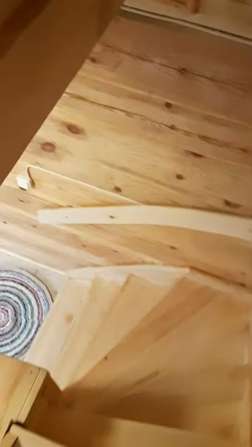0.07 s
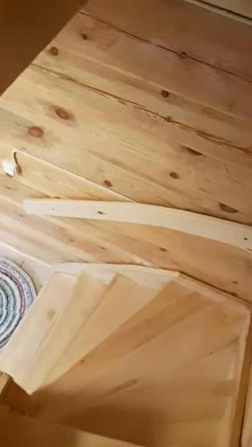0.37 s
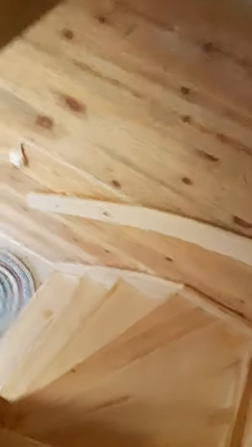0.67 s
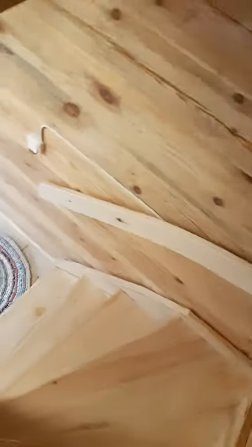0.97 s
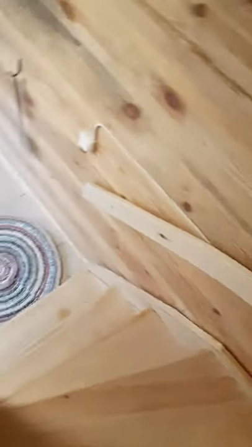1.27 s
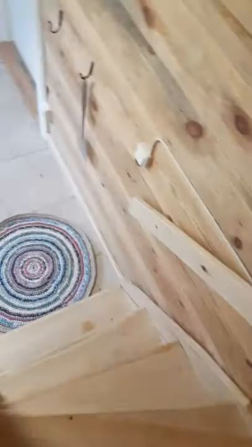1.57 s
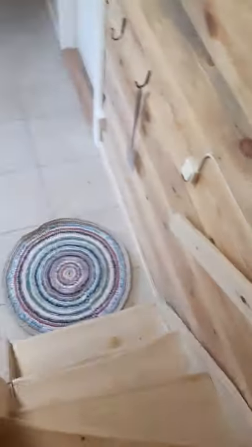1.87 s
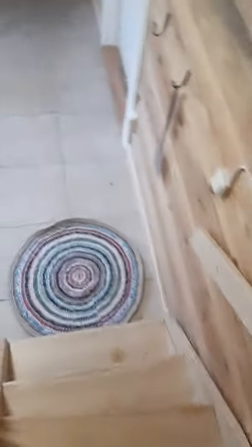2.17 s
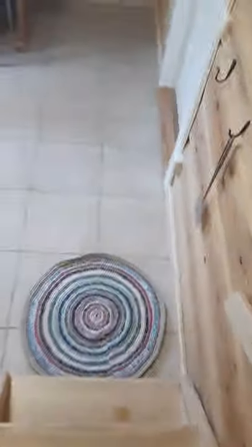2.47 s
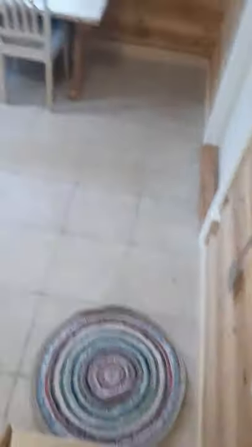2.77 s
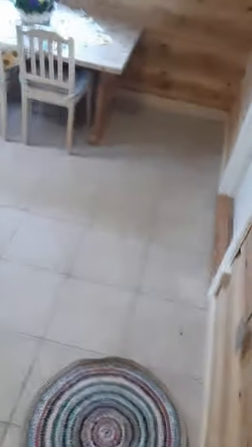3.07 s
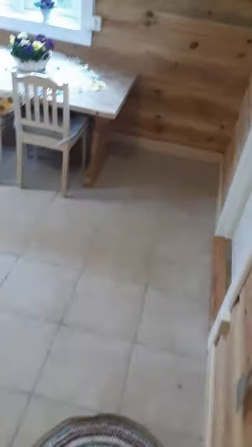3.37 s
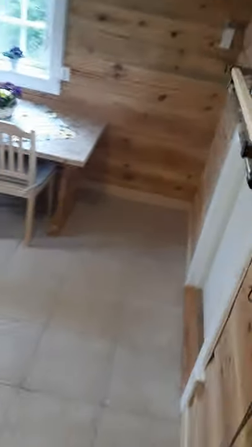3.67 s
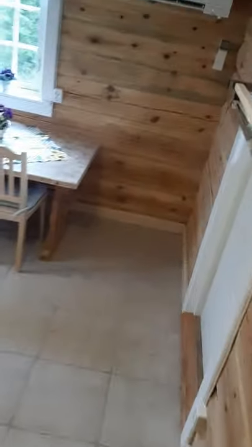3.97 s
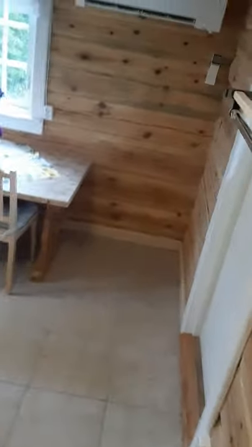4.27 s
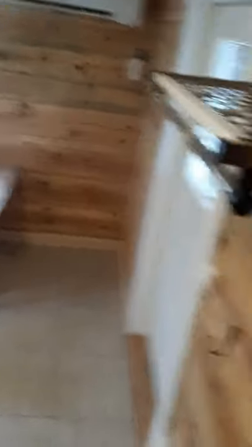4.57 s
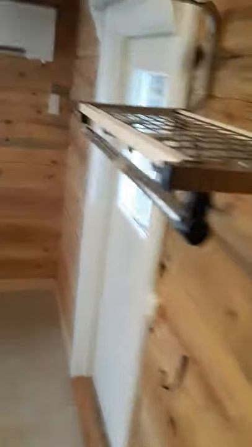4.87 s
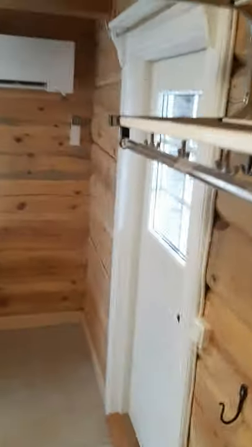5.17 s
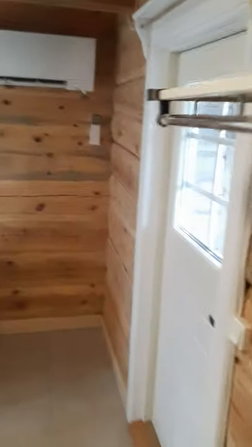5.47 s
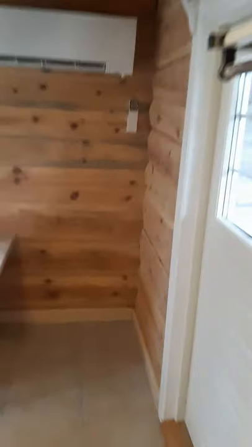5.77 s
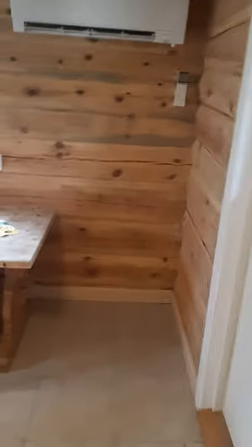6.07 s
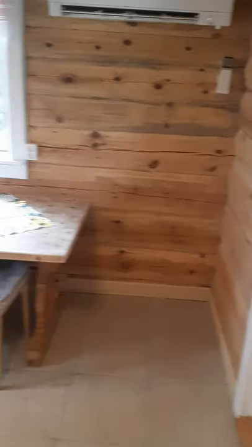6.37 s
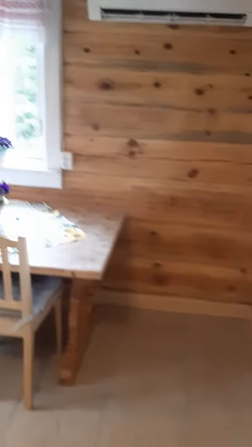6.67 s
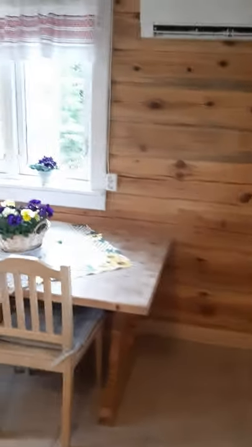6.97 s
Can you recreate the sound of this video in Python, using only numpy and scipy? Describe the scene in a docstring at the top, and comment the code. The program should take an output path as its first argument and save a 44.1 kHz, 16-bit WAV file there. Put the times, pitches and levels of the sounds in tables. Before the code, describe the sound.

A quiet cabin room with a faint steady hush, heard from a handheld microphone. A small finger bump and rub come right at the start, with more ticks around 1 second. Clothes rustle softly throughout, mostly on the left. A soft, hollow footfall and board knock sound on wooden stairs at 1.3 seconds, and a sleeve slides past on the right with a thin hiss until about 2.5. From 2.7 to 3.8 seconds come several low, booming steps with scuffs and knocks, the heaviest at 3.2 with a small heel click, and slight creaks near 3.6 and 3.8. At about 4.6 to 4.7 seconds the hand drags across the microphone on the right, a short scraping thump and by far the loudest sound, followed by a duller bump at 4.9. Faint rustles, ticks and a few tiny wood knocks continue until about 7 seconds.

```python
"""In a quiet cabin, someone walks softly down a winding pine staircase, phone in hand.
The stairs boom under each foot, boards knock and creak, and clothes rustle, mostly on the left,
where the microphone hole is open. The hand lies over the right hole and muffles the room there.
Its skin ticks and rubs on the case and once drags loudly across the hole; a sleeve slides past."""
import sys
import numpy as np
from scipy import signal
from scipy.fft import rfft, irfft, next_fast_len
from scipy.io import wavfile

SR = 44100
rng = np.random.default_rng(int(sys.argv[2]) if len(sys.argv) > 2 else 0)


def wav_record(signal):
    """Record a signal, one row per channel, as 16-bit PCM in the file named by sys.argv[1]."""
    frames = np.transpose(np.atleast_2d(signal))
    bounded = np.clip(frames, -1, 1)
    # unit amplitude maps onto the largest positive 16-bit level
    quanta = np.round(bounded * 32767).astype(np.int16)
    wavfile.write(sys.argv[1], SR, quanta)


N = 309582
TIME = np.arange(N) / SR

# tone of the still room and of the microphones' own hiss: (frequency [Hz], gain [dB])
ROOM_TONE = [(25, -1), (90, 15.5), (250, 2.5), (1500, -12.5), (3500, 0), (5800, 12), (8000, -2.5)]
MIC_TONE = [(4000, -0.5), (8000, -1.5), (15000, 4)]
# how the hand muffles the right hole: (frequency [Hz], gain [dB])
MUFFLED_TONE = [(200, 0), (1900, 1), (2800, -10), (4500, -15), (6000, -25), (9000, -21), (15000, -11)]
# how much of the room gets past the hand: (time [s], gain [dB])
HAND_LEAK = [(4.6, 0), (5.3, -5), (6.1, -12)]
# how much the body moves, nearly resting for half a second near the end: (time [s], gain [dB])
BODY_MOTION = [(0.2, 8), (0.33, -9), (0.55, 3), (5.15, 2.5), (5.33, -10), (5.85, -17.5), (6.15, -1)]
# limbs brushing the clothes, and a sleeve passing the right hole:
# (peak time [s], level [dB], rise [s], fall [s], hiss compared with rustle [dB])
CLOTHES_SWISHES = [(0.16, -48, 0.039, 0.021, -4.5), (0.78, -55, 0.211, 0.49, -5),
                   (0.88, -48.5, 0.0144, 0.022, -4), (1.36, -60, 0.06, 0.045, 5),
                   (1.64, -58, 0.042, 0.052, -11.5), (1.92, -54, 0.15, 0.092, 4),
                   (2.34, -49, 0.0976, 0.062, -8.5), (2.94, -51.5, 0.039, 0.0353, -4),
                   (3.165, -43.5, 0.014, 0.037, -8.5), (3.48, -54, 0.19, 0.32, -5),
                   (3.78, -45, 0.033, 0.032, -10), (4.56, -47.5, 0.09, 0.095, -5),
                   (5.0, -52.5, 0.17, 0.032, -5.5), (5.19, -57, 0.0304, 0.032, -3.5),
                   (6.33, -47, 0.043, 0.035, -10.5), (6.95, -55, 0.022, 0.042, -20)]
SLEEVE_SLIDES = [(1.119, -52, 0.04, 0.06, -0.5), (1.35, -51, .1, 0.087, 2), (1.64, -49.5, 0.051, 0.037, -2),
                 (1.801, -48, 0.083, 0.16, -1.5), (2.3, -54.5, 0.23, 0.11, -29.5),
                 (2.55, -50, 0.017, 0.035, -9)]
# tone of the broad rustle and fine hiss of each fabric: (frequency [Hz], gain [dB])
CLOTHES_TONE = [(30, -15.5), (90, 9.5), (180, 7.5), (330, 1.5), (650, 3.5), (1100, -1.5), (6700, -1.5),
                (7500, -13.5), (16000, -28.5)]
CLOTHES_HISS_TONE = [(30, -56), (5500, -28.5), (7300, 0), (15800, -1)]
SLEEVE_TONE = [(30, -23), (600, -6.5), (1900, 2), (3100, -1), (4850, 2), (5500, -39), (7500, -37),
               (16000, -26)]
SLEEVE_HISS_TONE = [(30, -43), (4300, -7), (5300, 16), (6500, 11.5), (7600, -2), (15800, 7.5)]
# the hand shifting its hold: (peak time [s], level [dB], rise [s], fall [s])
GRIP_SHIFTS = [(.05, -40.5, 0.022, 0.037), (.75, -54, 0.081, 0.069), (1.02, -46.5, 0.034, 0.052),
               (4.76, -40.5, 0.043, 0.029), (4.98, -47, 0.044, 0.08), (5.041, -38.5, 0.006, 0.011),
               (6.101, -52.5, 0.0076, 0.019), (6.269, -45, 0.0066, .01), (6.35, -54.5, 0.22, 0.39)]
# tone of the grip, of skin by the hole and of air squeezed through it: (frequency [Hz], gain [dB])
GRIP_TONE = [(25, -16), (70, 9), (140, -3.5), (450, -22), (2500, -48), (8000, -61)]
SKIN_TONE = [(25, -32), (60, -14), (130, 1.5), (300, 0.5), (450, -2.5), (1000, -2.5), (2500, -6),
             (4000, -4), (6000, -12), (8000, -16), (11000, -2), (15500, 10.5)]
FIZZ_TONE = [(6000, -41.5), (9000, -19.5), (12000, -2.5), (15000, -1)]
# fingers sticking and letting go: (time [s], level [dB], treble cutoff [Hz])
FINGER_TICKS = [(.026, -22, 3880), (0.9408, -25, 3870), (0.987, -22.5, 2200), (1.052, -27.5, 2000),
                (1.103, -35.5, 7000), (1.111, -30.5, 7000), (1.191, -34.5, 1500), (2.506, -31.5, 5000),
                (2.565, -38.5, 7000), (4.024, -32, 3900), (4.125, -39.5, 3900), (4.6798, -1, 1600),
                (4.698, -12.5, 14500), (5.203, -37, 3900)]
# skin rubbing the case: (peak time [s], level [dB], rise [s], fall [s], treble cutoff [Hz])
SKIN_RUBS = [(0.042, -30.5, 0.054, 0.011, 455), (0.668, -42.5, 0.031, 0.012, 568),
             (0.79, -39, 0.011, 0.027, 258), (0.983, -33, 0.007, 0.011, 386),
             (1.191, -45.5, 0.012, 0.0099, 885), (2.506, -47.5, 0.0014, 0.015, 1200),
             (3.7, -40.5, 0.014, 0.0082, 300), (3.796, -36.5, 0.0064, 0.0045, 913),
             (4.024, -44, 0.0026, 0.0061, 407), (4.182, -33.5, 0.0076, 0.017, 690),
             (4.618, -16, 0.023, 0.042, 726), (4.671, -10.5, 0.009, 0.0056, 720),
             (4.696, -11, 0.008, 0.013, 2150), (4.885, -13.5, 0.013, 0.018, 210),
             (5.125, -44, 0.00367, 0.014, 310), (5.217, -42.5, 0.0056, 0.0053, 530)]
# notes the phone case rings with: (frequency [Hz], width [Hz], gain [dB])
CASE_NOTES = [(742, 42, -7), (1390, 8.8, 5.5), (1743, 21, -0.5), (2025, 140, -6)]
# feet landing: (time [s], boom level [dB], boom treble cutoff [Hz], scuff level [dB], scuff fade [s])
FOOTFALLS = [(1.34, -40, 600, -50, 0.0975), (2.707, -40, 132, -58.5, 0.37), (2.821, -42.5, 70, -58, 0.106),
             (2.926, -43.5, 170, -50, 0.0637), (3.153, -33.5, 130, -41.5, 0.077),
             (3.175, -33, 330, -58.5, 0.155), (3.543, -43, 151, -52.5, 0.29),
             (3.755, -46, 107.1, -48.5, 0.033), (3.791, -45.5, 90, -63.5, 0.053),
             (4.36, -62, 249, -47, 0.0666)]
# low notes of the staircase and room: (frequency [Hz], gain [dB], time to fade by 60 dB [s])
STAIR_NOTES = [(87.6, -0.5, 0.62), (120.6, -10, 0.3), (141, 0.5, 0.6), (167.5, -2.5, 0.38),
               (205, -10.5, 0.22), (268, -9, 0.24), (319, -7, 0.54)]
# tone of a scuffing sole: (frequency [Hz], gain [dB])
SOLE_TONE = [(30, -10), (100, -1), (250, -1.5), (380, -2), (600, -3.5), (900, -5), (1400, -9), (2200, -9.5),
             (5400, -13), (8000, -25.5), (16000, -36)]
# notes of a pine step when scuffed and when creaking: (frequency [Hz], width [Hz], gain [dB])
SCUFF_NOTES = [(523, 82, -2), (792, 45, -1), (973, 39, -3.5)]
CREAK_NOTES = [(330, 35.2, 0.5), (465, 15, -2.5), (614, 29, -6.5), (1170, 45, -13), (1280, 34, -7.5)]
# boards knocking in their joints: (time [s], level [dB], pitch [Hz], rattle fade [s])
BOARD_KNOCKS = [(1.347, -35.5, 306, 0.047), (2.288, -40, 448, 0.013), (2.609, -40, 465, 0.0093),
                (2.714, -41, 307, 0.0125), (2.828, -43, 270, 0.021), (3.156, -36, 775, 0.013),
                (3.185, -34.5, 605, 0.027), (4.957, -42.5, 603, 0.0096), (5.516, -52.5, 370, .025),
                (6.326, -50.5, 496, .016)]
# a step creaking under the weight: (peak time [s], level [dB], rise [s], fall [s])
STEP_CREAKS = [(3.568, -51, 0.0054, 0.038), (3.761, -41, 0.0038, 0.024)]


def undb(db):
    """Turn decibels into a number to multiply by."""
    return 10 ** (np.asarray(db) / 20)


def unit(x):
    """Scale a sound to an average strength (rms) of 1."""
    return x / np.sqrt(np.mean(x ** 2))


def gain_curve(points):
    """A changing gain that joins (time [s], gain [dB]) points."""
    return undb(np.interp(TIME, *np.transpose(points)))


def wander(rate):
    """A random wobble, about 1 in size, that picks a new value rate times a second."""
    return np.interp(TIME * rate, np.arange(N), rng.standard_normal(N)) * np.sqrt(3 / 2)


def swell(s, rise, fall):
    """The power of one movement: it grows until time s, then dies away."""
    t = TIME - s
    return np.exp(-abs(t / np.where(t < 0, rise, fall)) ** 1.216)  # 1 is pointed, 2 is round


def friction(rate, rough_db):
    """Rubbing noise: tiny slips of uneven strength."""
    return unit(rng.standard_normal(N) * undb(rough_db * wander(rate)))


def colour(x, tone):
    """Filter a sound so that it takes on the given tone."""
    size = next_fast_len(N + 8192, True)
    hz, db = np.transpose(tone)
    bins = np.fft.rfftfreq(size, 1 / SR)
    gains = undb(np.interp(np.log(bins + 1), np.log(hz), db))
    # folding the cepstrum in half keeps the filter from ringing before a sound starts
    cepstrum = irfft(np.log(gains), size)
    cepstrum[1:size // 2] *= 2
    cepstrum[size // 2 + 1:] = 0
    return irfft(rfft(x, size) * np.exp(rfft(cepstrum)), size)[..., :N]


def soften(x, hz):
    """Turn down the treble above hz, as a soft touch does."""
    return signal.sosfilt(signal.butter(2, min(hz, SR / 3), fs=SR, output="sos"), x)


def resonate(x, notes):
    """An object shaken by x rings at its own notes."""
    return sum(undb(db) * signal.lfilter(*signal.iirpeak(hz, hz / width, fs=SR), x)
               for hz, width, db in notes)


def steady_noise(tone, db):
    """An even hush, different on the left and right."""
    return undb(db) * unit(colour(rng.standard_normal((2, N)), tone))


def cabin_echo(x, fade_s, echo_db):
    """Timber walls add a short, dull echo that falls by 60 dB in fade_s."""
    t = TIME[:SR // 2]
    tail = rng.standard_normal((2, len(t))) * np.exp(-np.log(1000) * t / fade_s)
    tail = soften(tail, 1500)
    tail /= np.sqrt(np.sum(tail ** 2, axis=1, keepdims=True))
    return x + undb(echo_db) * signal.fftconvolve(x, tail, axes=1)[:, :N]


def cloth(strokes, stir, rustle_tone, hiss_tone, flutter_db):
    """Fabric rubs on fabric: a broad rustle and a fine fibre hiss swell with each stroke."""
    rustle_power, hiss_power = stir ** 2, (stir * undb(-11)) ** 2
    for s, db, rise, fall, hiss_db in strokes:
        power = undb(db) ** 2 * swell(s, rise, fall)
        rustle_power = rustle_power + power
        hiss_power = hiss_power + power * undb(hiss_db) ** 2
    rustle = np.sqrt(rustle_power) * unit(colour(friction(700, rough_db=1.0), rustle_tone))
    hiss = np.sqrt(hiss_power) * unit(colour(friction(1500, rough_db=1.0), hiss_tone))
    return undb(flutter_db * wander(35)) * (rustle + hiss)


def clothes(motion):
    """Clothes stir as the body moves and swish as the limbs swing, louder on the left."""
    stir = undb(-62) * motion
    sides = [cloth(CLOTHES_SWISHES, stir, CLOTHES_TONE, CLOTHES_HISS_TONE, flutter_db=0.81)
             for _ in range(2)]
    return undb([[1.0], [-1.5]]) * np.array(sides)


def grip_rumble(motion):
    """The hand rumbles on the case as the body moves, more so when it shifts its hold."""
    holding = (undb(-66.5) * motion) ** 2
    shifting = sum(undb(db) ** 2 * swell(s, rise, fall) for s, db, rise, fall in GRIP_SHIFTS)
    strength = np.sqrt(holding + shifting) * undb(2.5 * wander(31))
    return strength * unit(colour(rng.standard_normal(N), GRIP_TONE))


def finger_ticks():
    """Skin lets go with a snap, then the air under the finger settles with a slower swing back."""
    out, t = np.zeros(N), TIME[:SR // 20]
    snap = np.exp(-t / 0.00028)
    swing = 0.48 * np.exp(-t / 0.0014) * np.sin(2 * np.pi * 160 * t)
    for s, db, cutoff_hz in FINGER_TICKS:
        start = int(s * SR)
        out[start:start + len(t)] -= undb(db) * soften(snap - swing, cutoff_hz)
    return undb(9.0) * colour(out, SKIN_TONE)


def skin_rubs():
    """Skin jerks over the case, brighter on a fast drag, and air fizzes through the tiny hole."""
    out = np.zeros(N)
    slips = colour(friction(600, rough_db=2.1), SKIN_TONE)
    slips = slips + resonate(slips, CASE_NOTES)
    fizz = unit(colour(friction(900, rough_db=2.5), FIZZ_TONE))
    for s, db, rise, fall, cutoff_hz in SKIN_RUBS:
        near = abs(TIME - s) < .2
        t = TIME[near] - s
        pressure = np.exp(-abs(t / np.where(t < 0, rise, fall)) ** 1.594 / 2)
        stroke = unit(pressure * soften(slips[near], cutoff_hz)) * np.sqrt(np.mean(pressure ** 2))
        # the fizz grows more slowly than the rub, and dull rubs have little of it
        fizz_gain = undb(-29.5 + 0.6 * db) / (1 + (400 / cutoff_hz) ** 3)
        out[near] += undb(db) * stroke + fizz_gain * pressure * fizz[near]
    return out


def sleeve():
    """A sleeve slides over the right hole; once its weave sings, higher and louder with speed."""
    speed = np.sqrt(swell(2, rise=0.28, fall=0.07))
    hz = 4540 + 400 * speed + 90 * wander(7)
    spread = soften(rng.standard_normal(N), 320)  # blurs the note into a narrow hiss
    weave = unit(spread * np.sin(2 * np.pi * np.cumsum(hz) / SR))
    sliding = cloth(SLEEVE_SLIDES, 0, SLEEVE_TONE, SLEEVE_HISS_TONE, flutter_db=1.5)
    return sliding + undb(-50 + wander(20)) * speed * weave


def footsteps():
    """The weight of each foot makes the stairs boom, and the sole scuffs over the hollow step."""
    boom, scuff_strength = np.zeros(N), np.zeros(N)
    hz, db, ring_s = np.transpose(STAIR_NOTES)[:, :, None]
    # neighbouring notes swing against each other, so the boom builds up
    signs = (-1) ** np.arange(len(STAIR_NOTES))[:, None]
    # echoes in the stairwell make each note fade unevenly
    waver = undb(2.5 * np.array([wander(30) for _ in STAIR_NOTES]))
    for s, boom_db, cutoff_hz, scuff_db, scuff_fade in FOOTFALLS:
        start = int(s * SR)
        t = TIME[:min(SR, N - start)]
        span = slice(start, start + len(t))
        # every step is cut a little differently, so its notes vary
        gain_chance, pitch_chance = rng.standard_normal((2, len(STAIR_NOTES), 1))
        gains = undb(db + 1.5 * gain_chance) / np.hypot(1, (hz / cutoff_hz) ** 1.9)
        shift = 1 + 0.025 * np.log2(hz / hz[0]) * pitch_chance
        fading = waver[:, span] * np.exp(-np.log(1000) * t / ring_s)
        notes = signs * fading * np.sin(2 * np.pi * hz * shift * t)
        ring = (gains * notes).sum(0) / np.sqrt(np.sum(gains ** 2) / 2)
        boom[span] += undb(boom_db) * (1 - np.exp(-t / 0.001)) * ring
        scuff_strength[span] += undb(scuff_db) * np.exp(-t / scuff_fade)
    both_sides = friction(400, rough_db=1.8)
    scuffs = colour(both_sides + 1.2 * rng.standard_normal((2, N)), SOLE_TONE)
    # the boom carries little of the deepest bass, below about 55 Hz
    boom = signal.sosfilt(signal.butter(2, 55, "high", fs=SR, output="sos"), boom)
    return boom + scuff_strength * unit(scuffs + resonate(scuffs, SCUFF_NOTES))


def board_knocks():
    """A shifting board jolts quickly and rings hollow, with a weaker note above and below."""
    out, t = np.zeros((2, N)), TIME[:SR // 3]
    for s, db, hz, fade in BOARD_KNOCKS:
        phase = 2 * np.pi * hz * t
        side_notes = np.sin(0.783 * phase) + np.sin(1.37 * phase)
        ring = (np.sin(phase) + 0.59 * side_notes) * np.exp(-t / 0.009)
        jolts = rng.standard_normal((2, len(t))) * np.exp(-t / fade)
        knock = signal.fftconvolve(jolts, ring[None], axes=1)[:, :len(t)]
        start = int(s * SR)
        out[:, start:start + len(t)] += undb(db) * unit(knock) * np.sqrt(np.mean(ring ** 2))
    return out


def heel_click(s=3.1555, db=-29.5, hz=5500):
    """On the heaviest footfall the heel meets the wood with a brief, bright ring."""
    t = np.maximum(TIME - s, 0)
    return undb(db) * np.sin(2 * np.pi * hz * t) * np.exp(-t / 0.0023)


def step_creaks(slips_per_s=740):
    """A loaded step sticks and slips in its groove, and the slips make the board ring."""
    slips = (rng.random(N) < slips_per_s / SR) * rng.standard_normal(N)
    wood, out = resonate(slips, CREAK_NOTES), np.zeros(N)
    for s, db, rise, fall in STEP_CREAKS:
        power = swell(s, rise, fall)
        out += undb(db) * unit(np.sqrt(power) * wood) * np.sqrt(np.mean(power))
    return undb([[-2.0], [1.5]]) * out  # louder on the right


def scene():
    """The room reaches both holes, the right one muffled; hand and sleeve sound on the right."""
    motion = gain_curve(BODY_MOTION)
    rustle = clothes(motion)
    room = steady_noise(ROOM_TONE, db=-69)
    stairs = footsteps() + heel_click() + board_knocks() + step_creaks()
    left, right = cabin_echo(stairs + rustle, fade_s=0.12, echo_db=-17.5) + room
    right = gain_curve(HAND_LEAK) * colour(right, MUFFLED_TONE)
    hand = skin_rubs() + finger_ticks() + grip_rumble(motion)
    left = left + undb(-45.5) * hand  # a trace travels through the case
    right = right + hand + sleeve()
    return np.array([left, right]) + steady_noise(MIC_TONE, db=-74.5)


def record(dry, top_hz=15900):
    """The phone flattens peaks that are too loud and cuts the highest treble."""
    treble_cut = signal.ellip(10, .2, 70, top_hz, fs=SR, output="sos")
    return signal.sosfilt(treble_cut, np.clip(dry, -1, 1))


dry = scene()
out = record(dry)
wav_record(out)
```